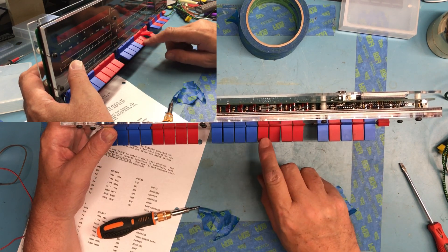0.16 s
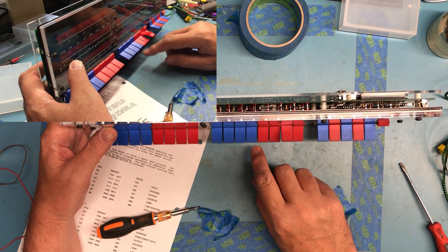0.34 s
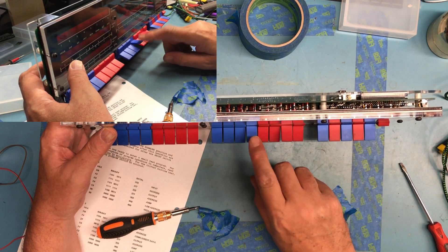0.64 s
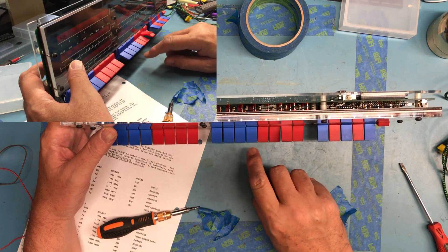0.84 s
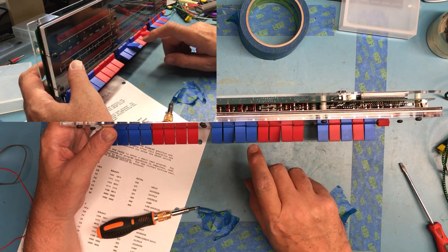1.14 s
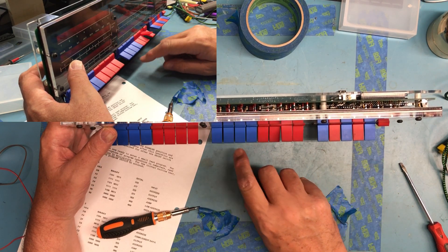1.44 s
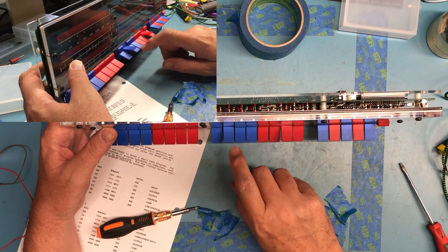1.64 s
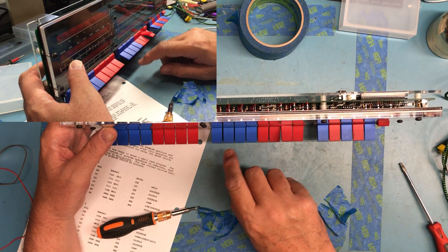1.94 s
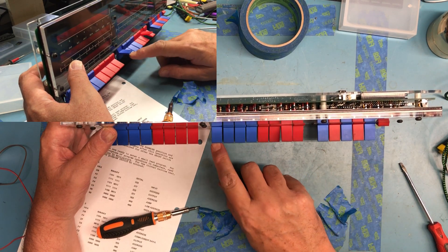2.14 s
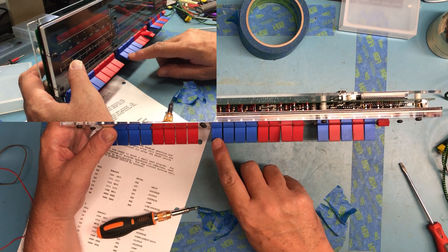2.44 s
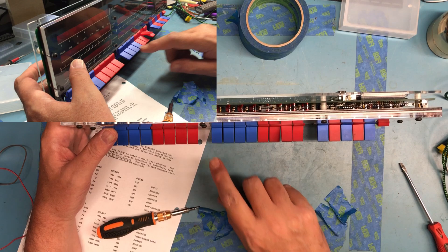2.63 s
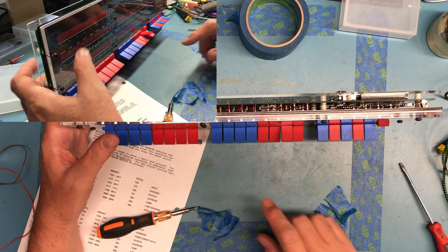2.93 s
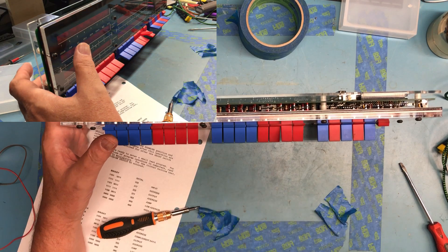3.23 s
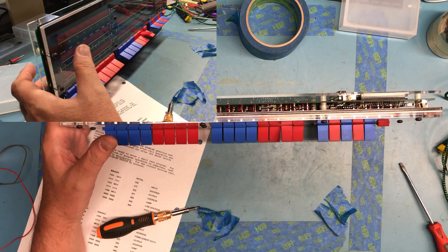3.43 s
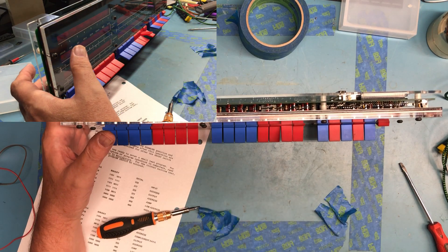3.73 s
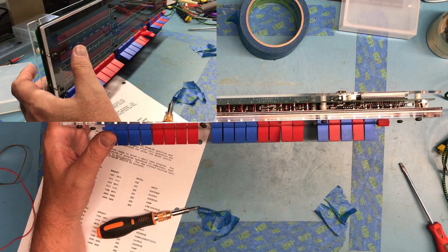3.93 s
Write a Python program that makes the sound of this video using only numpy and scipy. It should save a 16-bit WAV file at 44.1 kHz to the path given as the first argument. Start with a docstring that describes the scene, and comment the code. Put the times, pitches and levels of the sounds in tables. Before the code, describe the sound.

A finger flicks nine plastic paddle switches in turn, about one every 0.3 seconds. Each is a bright metallic snap with an almost simultaneous landing clack, a short hollow panel knock and a slight low thump. Tiny ticks and scrapes fall between some of them. After two and a half seconds only soft hand rubbing and quiet ventilation rumble remain. Close microphone, small room.

```python
"""Nine paddle switches flicked on a panel

A finger flicks nine plastic paddle switches, one after another, on a circuit-board panel held on a workbench.
Ticks, snaps and stops are short bursts of shaped noise; the panel answers with dying sine modes and noise.
Scrapes and a hand sliding softly away at the end are grainy noise over a bed of ventilation rumble.
The small room is a decaying noise tail convolved with the switches."""
import sys
import numpy as np
from scipy import signal
from scipy.fft import irfft
from scipy.io import wavfile
from scipy.ndimage import uniform_filter1d

SR = 44100
rng = np.random.default_rng(int(sys.argv[2]) if len(sys.argv) > 2 else 0)


def wav_record(signal):
    """Record a signal, one row per channel, as 16-bit PCM in the file named by sys.argv[1]."""
    frames = np.transpose(np.atleast_2d(signal))
    bounded = np.clip(frames, -1, 1)
    # unit amplitude maps onto the largest positive 16-bit level
    quanta = np.round(bounded * 32767).astype(np.int16)
    wavfile.write(sys.argv[1], SR, quanta)


N = 179707  # samples

# Tone colour of metal contacts and scrapes. Each row: frequency in Hz, relative level in dB.
SNAP_COLOUR = [(300, -3.5), (800, -17.5), (1500, -2.5), (2800, -10), (4000, -1.5), (5300, -3.5),
               (7000, 0.5), (8800, 1.5), (10200, -1), (12000, 0), (15000, -3.5), (16000, -21.5)]
# Light ticks as a spring passes its centre or a paddle settles. Each row: start in seconds,
# relative click level in dB, click ring in Hz, relative knock level in dB, relative thump level in dB.
TICKS = [(0.1592, -33.5, 8140, -41.5, -37.5), (.265, -62, 3600, -51.5, -48),
         (0.4541, -37.5, 3740, -39, -34.5), (0.7309, -61, 3600, -47.5, -58),
         (1.0328, -34.5, 8400, -43, -38), (1.3252, -56, 3610, -53, -48), (1.5989, -39, 8060, -47.5, -39.5),
         (2.1534, -34, 6400, -42, -39), (2.4541, -49, 3840, -65, -60)]
# The contact breaks free and snaps over, then the paddle lands on its stop and pushes on the panel.
# Each row: snap time in seconds, release level in dB, snap level in dB, snap tilt in dB per octave,
# snap ring in Hz, travel to the stop in seconds, stop level in dB, stop ring in Hz, knock level in dB,
# leading panel resonance in Hz, thump level in dB, leading thump frequency in Hz,
# throw 0-1 (blends the panel's ring for the two directions). Levels are relative.
FLICKS = [(0.1794, -46, -20, 4, 6850, 0.0029, -19.5, 8470, -29.5, 1230, -31, 165, .04),
          (0.5242, -34, -22, -1.5, 6900, .0052, -27.5, 7800, -31.5, 1580, -39, 190, 0.63),
          (0.7734, -49, -24.5, 12, 9500, 0.0042, -27, 3320, -25.5, 1570, -33, 142, 0.52),
          (1.081, -31, -20, -1.5, 8500, 0.0059, -20.5, 3630, -30, 1690, -30, 186, 0.6),
          (1.3558, -38, -24.5, 10, 6400, 0.0037, -22.5, 3700, -28, 1330, -31.5, 156, 0.01),
          (1.6527, -35, -32, -6.5, 6600, .0060, -24, 7150, -33, 1730, -32, 215, 0.82),
          (1.9001, -36, -21.5, 2, 6500, 0.0042, -25.5, 8500, -29.5, 1390, -37, 72, 0.15),
          (2.1982, -36, -19, 1, 7560, 0.0054, -21.5, 8100, -34, 1640, -37, 100, 0.83),
          (2.4806, -46, -23, 4, 3620, 0.004, -22, 4500, -25.5, 1080, -33.5, 79, 0.61)]


def amp(db):
    """Decibels to gain."""
    return 10 ** (np.asarray(db) / 20)


def unit(x):
    """Scales to rms 1."""
    return x / np.sqrt(np.mean(x ** 2) + 1e-20)


def read(points, hz):
    """Reads a table on a log-frequency axis."""
    f, value = np.transpose(points)
    return np.interp(np.log(hz + 1), np.log(f + 1), value)


def add(mix, s, sound):
    """Mixes a sound in at a time in seconds."""
    part = mix[round(s * SR):][:len(sound)]
    part += sound[:len(part)]


def noise(shape, size):
    """Random-phase noise of rms 1 whose spectrum follows the function shape(Hz), in relative dB."""
    hz = np.fft.rfftfreq(size, 1 / SR)
    phase = 2 * np.pi * rng.random(len(hz))
    return unit(irfft(amp(shape(hz)) * np.exp(1j * phase), size))


def hump(hz, centre_hz, width_hz):
    """A resonance curve of height 1 that is width_hz wide at half height."""
    return 1 / (1 + (2 * (hz - centre_hz) / width_hz) ** 2)


def fade(t60, t):
    """A decay that loses 60 dB in t60 seconds."""
    return amp(-60 * t / t60)


def ring(hz, t60, t):
    """One dying sine mode."""
    return np.sin(2 * np.pi * hz * t) * fade(t60, t)


def swell(middle_s, half_s, db):
    """A smooth bell-shaped rise and fall of level."""
    t = np.arange(N) / SR
    return amp(db) * np.exp(-((t - middle_s) / half_s) ** 2)


def ventilation(air_db=-50.5, drone_width_hz=9, draught_db=-41, draught_hz=9):
    """Low rumble, faint wavering fan tones and a slow draught on the microphone, all of shaped noise."""
    # Rumble colour. Each row: frequency in Hz, relative level in dB per Hz.
    air_colour = [(8.8, -72.5), (15, -6.5), (59, -12.5), (81, -16.5), (146, -19.5), (303, -25.5),
                  (361, -28), (405, -23), (455, -33), (840, -30), (972, -33.5), (1130, -31.5), (2080, -48),
                  (10600, -57), (16000, -60)]
    # Fan tones as narrow noise bands. Each row: frequency in Hz, level in dB.
    fan_tones = [(48, -53), (112, -63), (302, -66), (403, -75), (735, -72.5)]

    def band(centre_hz, reach_hz):
        # 12 dB down at reach_hz either side of the centre
        return noise(lambda hz: 40 * np.log10(hump(hz, centre_hz, 2 * reach_hz)), size=N)

    air = amp(air_db) * noise(lambda hz: read(air_colour, hz), size=N)
    drone = sum(amp(db) * band(f, drone_width_hz) for f, db in fan_tones)
    draught = amp(draught_db) * band(draught_hz, draught_hz)
    return air + drone + draught


def scrape(tilt_db, grain_db):
    """Sticking and slipping on a paddle: noise with a level that flickers in fine grains."""
    flicker = unit(uniform_filter1d(rng.standard_normal(N), size=60))
    grains = unit(amp(grain_db * flicker))

    def colour(hz):
        return read(SNAP_COLOUR, hz) + tilt_db * np.log2(1 + hz / 1000)
    return grains * noise(colour, size=N)


def rubs(drag_lead_s=0.0044, drag_half_s=0.024, drag_below_release_db=-21.5):
    """The paddle scrapes around each snap; between flicks the fingertip brushes the paddles."""
    # Fingertip brushes. Each row: middle in seconds, half length in seconds, level in dB.
    strokes = [(0, 0.054, -60.5), (0.262, 0.015, -51.5), (0.398, 0.018, -63.5), (.512, .014, -52.5),
               (0.74, .014, -61), (1.33, .011, -52.5), (1.55, 0.078, -68)]
    # a stiffer paddle, with a louder release, also drags louder
    drags = sum(swell(s - drag_lead_s, drag_half_s, release_db + drag_below_release_db)
                for s, release_db, *_ in FLICKS)
    brushes = sum(swell(*stroke) for stroke in strokes)
    return drags * scrape(tilt_db=-8.5, grain_db=2) + brushes * scrape(tilt_db=-7, grain_db=2)


def metal_blows(tick_tilt_db=-4, release_lead_s=0.003, release_tilt_db=-1, stop_tilt_db=-4.5):
    """Each tick, and each flick's release, snap and stop: (s, relative dB, tilt dB per octave, ring Hz)."""
    blows = [(s, db, tick_tilt_db, hz) for s, db, hz, _, _ in TICKS]
    for s, release_db, snap_db, tilt, snap_hz, travel_s, stop_db, stop_hz, *_ in FLICKS:
        blows += [(s - release_lead_s, release_db, release_tilt_db, snap_hz),
                  (s, snap_db, tilt, snap_hz),
                  (s + travel_s, stop_db, stop_tilt_db, stop_hz)]
    return blows


def snaps(low_ring_db=8, high_ring_db=6, high_ring_hz=12000, high_scatter=0.1, ring_share=0.074,
          crack_s=0.00022, crack_db=-7, crack_rise_s=0.00015, chatter_s=0.0032,
          linger_s=0.014, linger_db=-16, level_db=-1.26):
    """Spring and contact chatter: a crack, milliseconds of dense metal modes, a weaker housing ring."""
    out, t = np.zeros(N), np.arange(4096) / SR
    crack = amp(crack_db) * np.exp(-t / crack_s)
    chatter = np.exp(-(t / chatter_s) ** 2)
    linger = amp(linger_db) * np.exp(-t / linger_s)
    decay = (1 - np.exp(-t / crack_rise_s)) * (crack + chatter + linger)
    for s, db, tilt, low_hz in metal_blows():
        # the upper resonance lands elsewhere on every blow
        high_hz = high_ring_hz * np.exp(high_scatter * rng.standard_normal())

        def colour(hz):
            low = low_ring_db * hump(hz, low_hz, ring_share * low_hz)
            high = high_ring_db * hump(hz, high_hz, ring_share * high_hz)
            # the tilt stays flat below 2500 Hz
            slope = tilt * np.log2(np.maximum(hz, 2500) / 7000)
            return read(SNAP_COLOUR, hz) + low + high + slope
        add(out, s, amp(db + level_db) * decay * noise(colour, size=len(t)))
    return out


def panel_blows(lag_s=0.00032, tick_lead_hz=1500, tick_thump_hz=141, tick_throw=0.45):
    """Ticks and stops push on the panel: (s, knock dB, leading Hz, thump dB, thump Hz, throw)."""
    light = [(s + lag_s, knock_db, tick_lead_hz, thump_db, tick_thump_hz, tick_throw)
             for s, _, _, knock_db, thump_db in TICKS]
    stops = [(s + travel_s + lag_s, *push) for s, _, _, _, _, travel_s, _, _, *push in FLICKS]
    return light + stops


def knocks(scatter=0.016, clatter_db=-1, clatter_t60=0.083, lead_db=6, lead_width_hz=260, rise_s=0.001):
    """The paddle lands; each switch sits elsewhere on the panel and favours other modes."""
    # Modes of panel and paddles, slightly detuned on each blow. Each row: nominal frequency in Hz,
    # t60 in seconds, relative level in dB for one throw, relative level in dB for the other.
    modes = [(340.7, 0.023, -10, -20.5), (485.5, 0.08, -6, -22.5), (535.5, 0.18, -16, -29),
             (794, 0.093, -13.5, -12.5), (1028.5, 0.055, -10, -3.5), (1176.6, 0.11, -7, -15.5),
             (1311, 0.07, -7.5, -9.5), (1423, 0.18, -15.5, -8.5), (1647, 0.061, -7.5, -3),
             (1710, 0.057, -5, -3), (1818, 0.0082, -12.5, -22.5), (1969, 0.078, -5, -10.5),
             (2094, 0.11, -8, -29), (2596, 0.044, -21.5, -17), (3370, 0.0154, -8.5, -5),
             (3644, 0.022, 0.5, 0.5)]
    # The panel's crowd of weaker modes, as noise. Each row: frequency in Hz,
    # relative level in dB for one throw, relative level in dB for the other.
    clatter = [(100, -6, -12), (299.8, -9, -6.5), (480, -4.5, -15), (650, -10, -7.5), (905, 1, -5.5),
               (1240, -6.5, 1), (1910, 1, -14), (2630, 0.5, -5), (4430, -27.5, -2.5), (7940, -17, -2),
               (14870, -38.5, -39)]
    out, t = np.zeros(N), np.arange(SR // 3) / SR
    for s, knock_db, lead_hz, _, _, throw in panel_blows():
        def colour(hz):
            crowd = [(f, one + throw * (other - one)) for f, one, other in clatter]
            return read(crowd, hz) + lead_db * hump(hz, lead_hz, lead_width_hz)
        knock = amp(clatter_db) * fade(clatter_t60, t) * noise(colour, size=len(t))
        detune = rng.standard_normal(len(modes))
        sign = rng.choice([-1, 1], len(modes))
        for (hz, t60, one, other), d, side in zip(modes, detune, sign):
            db = one + throw * (other - one) + lead_db * hump(hz, lead_hz, lead_width_hz)
            knock = knock + side * amp(db) * ring(hz * (1 + scatter * d), t60, t)
        add(out, s, amp(knock_db) * knock * (1 - np.exp(-t / rise_s)))
    return out


def thumps(t60=0.15, rise_s=0.0079, width_hz=90):
    """The whole panel flexes, slow to start; where it is pushed decides which bending mode leads."""
    # Bending modes of the whole panel. Each row: frequency in Hz, relative level in dB.
    bending = [(70, 7), (138, 0.5), (192, -11.5), (214, 0), (245, -4.5)]
    out, t = np.zeros(N), np.arange(SR // 3) / SR
    for s, _, _, thump_db, thump_hz, _ in panel_blows():
        flex = np.zeros(len(t))
        for k, (hz, db) in enumerate(bending):
            share = np.sqrt(hump(hz, thump_hz, width_hz))
            # neighbouring modes start in opposite directions
            flex += (-1) ** k * share * amp(db) * ring(hz, t60, t)
        add(out, s, amp(thump_db) * flex * (1 - np.exp(-t / rise_s)))
    return out


def switches():
    """All that the switches and the panel send out in one direction."""
    return snaps() + knocks() + thumps() + rubs()


def room(x, wet_db=-7):
    """A short diffuse tail that builds up just after the direct sound, decaying at its own rate per band."""
    # Reverberation time. Each row: frequency in Hz, t60 in seconds.
    decay_times = [(150, 0.22), (600, 0.27), (1400, 0.2), (4000, 0.17), (9000, 0.18), (15000, 0.12)]
    # Colour of the tail. Each row: frequency in Hz, relative level in dB.
    tail_colour = [(100, -16), (500, -7.5), (1400, -6), (4000, 0.5), (9000, -3.5), (15000, 7)]
    t = np.arange(SR // 2) / SR
    hz, frame_s, z = signal.stft(rng.standard_normal(len(t)), SR, nperseg=256)
    z = z * amp(read(tail_colour, hz)[:, None]) * fade(read(decay_times, hz)[:, None], frame_s)
    build = 1 - np.exp(-np.maximum(t - 0.002, 0) / 0.003)  # silent for 2 ms, then a 3 ms rise
    tail = signal.istft(z, SR, nperseg=256)[1][:len(t)] * build
    return amp(wet_db) * signal.fftconvolve(x, tail / np.linalg.norm(tail))[:N]


def hand(hiss_db=2.0, body_db=1.0, split_hz=3200, fuller_db_per_s=6, full_s=3.85, grain_db=1.0, scuff_db=2.5):
    """Skin slides with a fine hiss over an uneven scuffing that grows fuller as it goes on."""
    # Loudness of the slide. Each row: time in seconds, relative level in dB.
    slide = [(3.15, -82), (3.342, -59.5), (3.494, -56.5), (3.548, -66), (3.566, -60.5), (3.81, -57),
             (3.84, -60.5), (4.058, -51), (4.07, -55)]
    # Colour of skin on the bench. Each row: frequency in Hz, relative level in dB.
    skin_colour = [(120, -10.5), (240, 13.5), (500, -3.5), (850, 5.5), (1300, -0.5), (1900, 0.5),
                   (2450, 1.5), (3100, -1), (4500, -2.5), (9000, 1), (15500, -4)]
    t, (s, db) = np.arange(N) / SR, np.transpose(slide)
    # the hand first draws back over the bench in one soft swell
    withdraw = swell(middle_s=2.864, half_s=0.27, db=-68.5)
    level = withdraw + amp(np.interp(t, s, db, left=-120))
    grain = unit(uniform_filter1d(rng.standard_normal(N), size=200))
    scuff = unit(uniform_filter1d(rng.standard_normal(N), size=2500))
    skin = noise(lambda hz: read(skin_colour, hz), size=N)
    body = signal.sosfiltfilt(signal.butter(2, split_hz, fs=SR, output="sos"), skin)
    hiss = skin - body
    fuller = amp(body_db + fuller_db_per_s * (t - full_s) + scuff_db * scuff)
    return level * amp(hiss_db + grain_db * grain) * (hiss + fuller * body)


def scene(count=2):
    """Each direction carries its own mix of the dense modes; the room gathers several of them."""
    echoes = sum(room(switches()) for _ in range(count)) / np.sqrt(count)
    return (switches() + echoes + ventilation() + hand())[None]


def record(dry, edge_hz=16000):
    """The recorder's band limit, with a brief fade at either end."""
    faded = dry * signal.windows.tukey(N, 0.002)
    low_pass = signal.firwin(255, edge_hz, window=("kaiser", 8), fs=SR)
    return signal.oaconvolve(faded, low_pass[None], "same")


dry = scene()
out = record(dry)
wav_record(out)
```